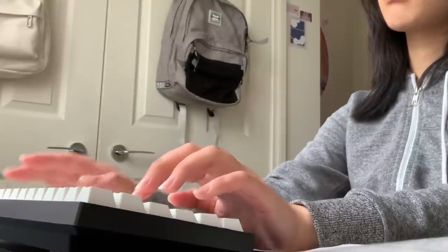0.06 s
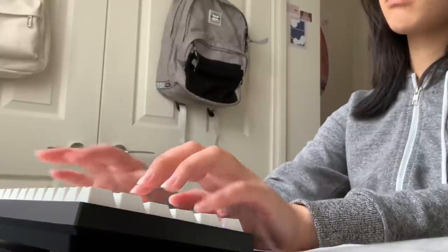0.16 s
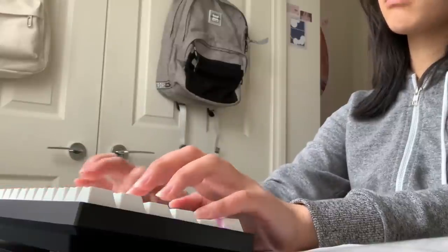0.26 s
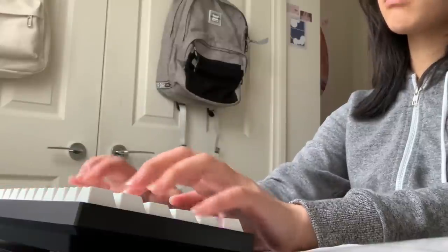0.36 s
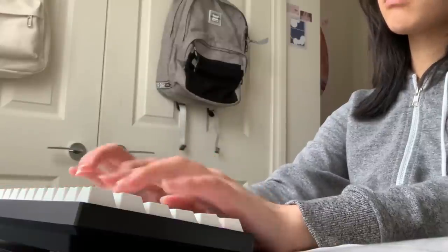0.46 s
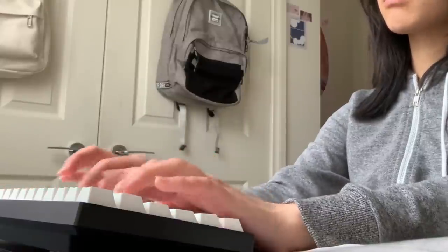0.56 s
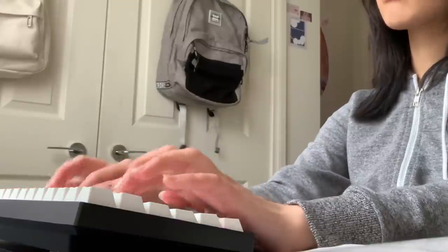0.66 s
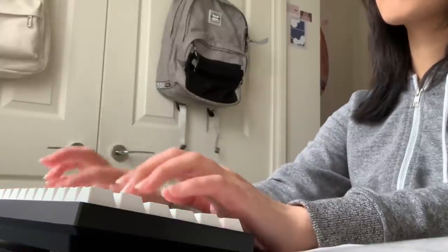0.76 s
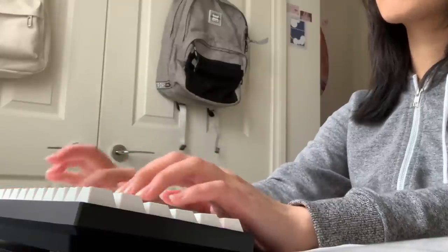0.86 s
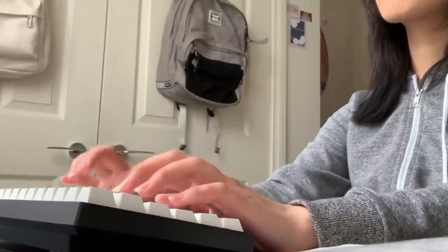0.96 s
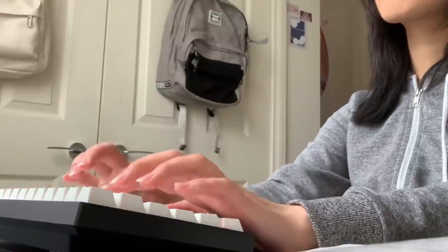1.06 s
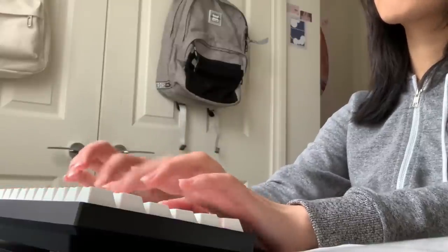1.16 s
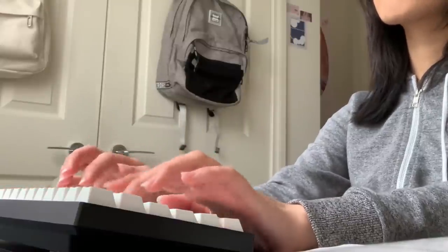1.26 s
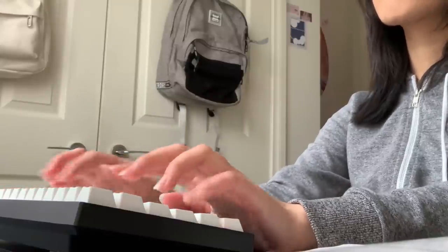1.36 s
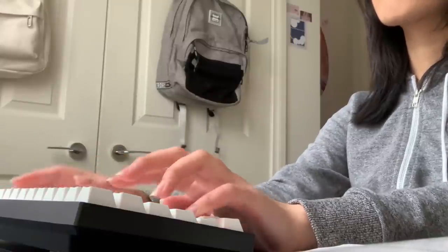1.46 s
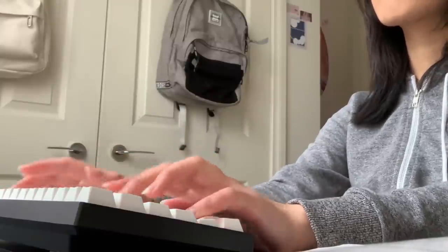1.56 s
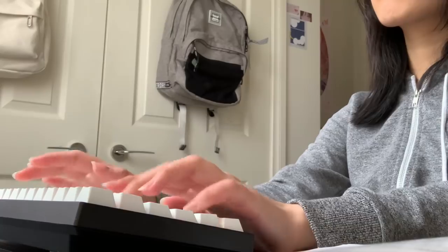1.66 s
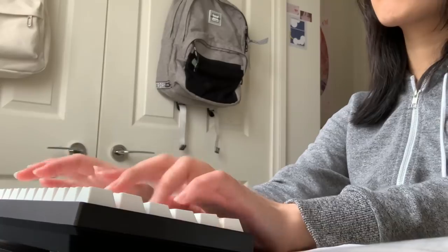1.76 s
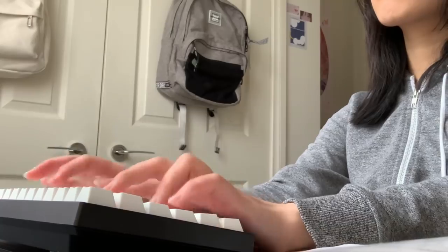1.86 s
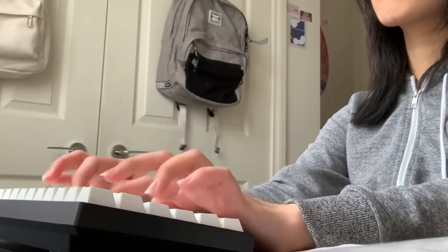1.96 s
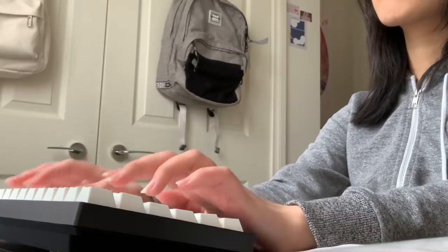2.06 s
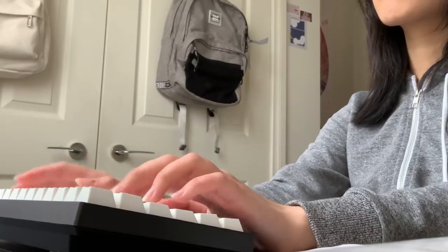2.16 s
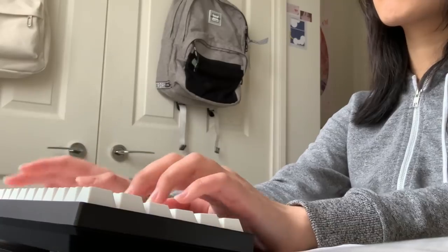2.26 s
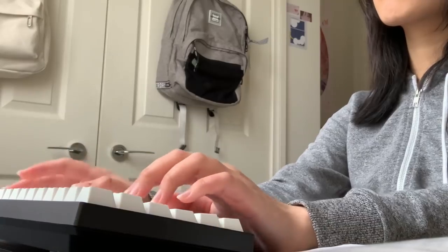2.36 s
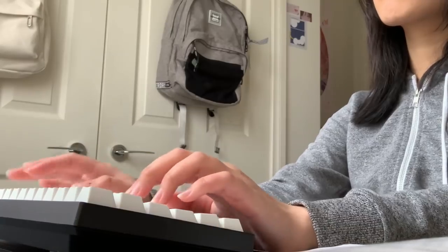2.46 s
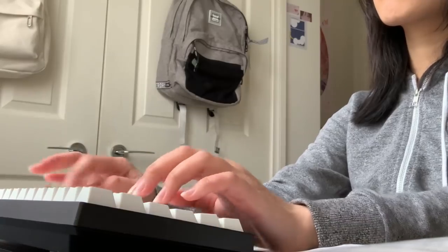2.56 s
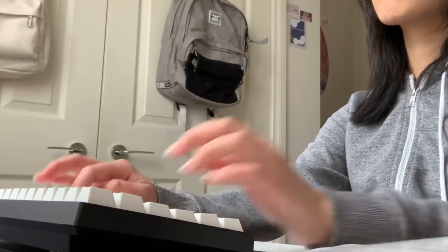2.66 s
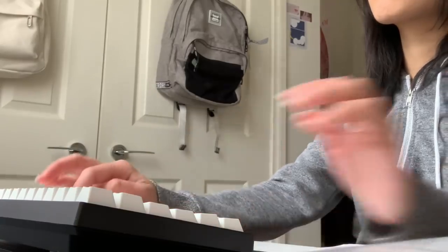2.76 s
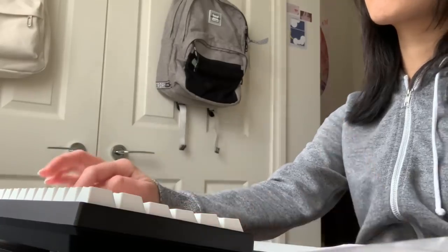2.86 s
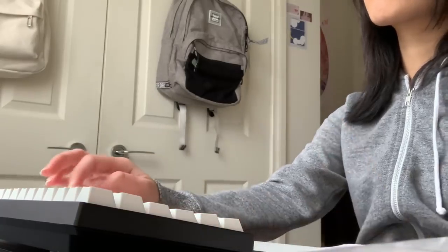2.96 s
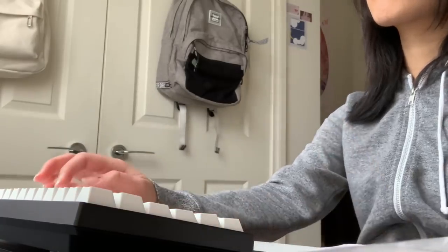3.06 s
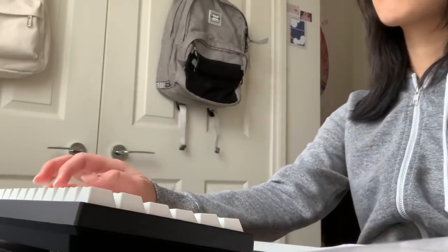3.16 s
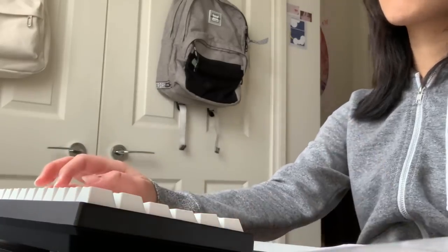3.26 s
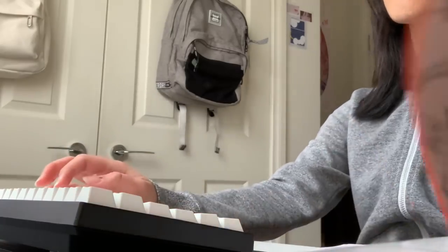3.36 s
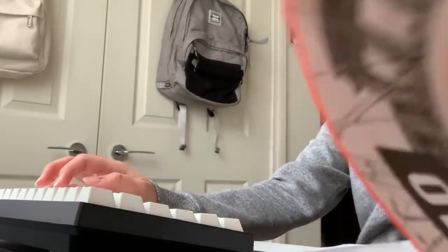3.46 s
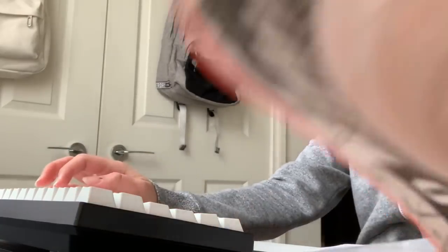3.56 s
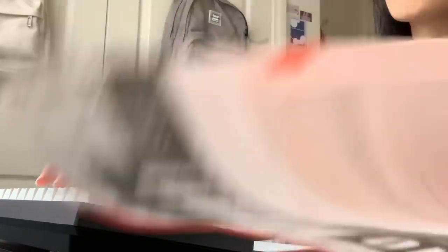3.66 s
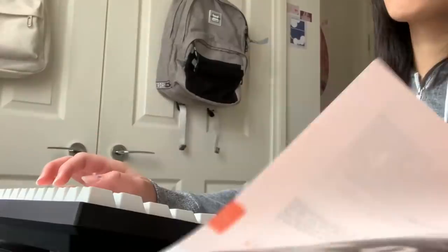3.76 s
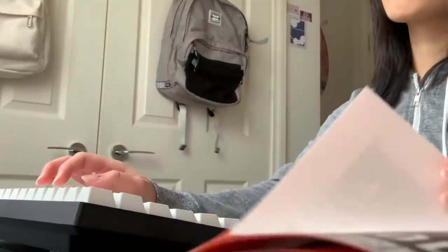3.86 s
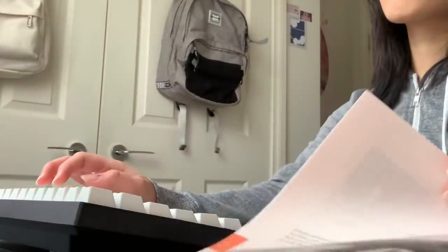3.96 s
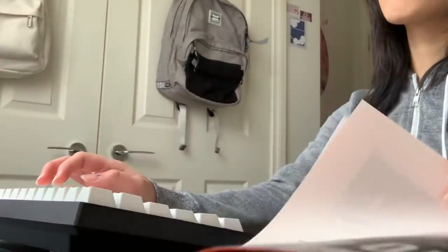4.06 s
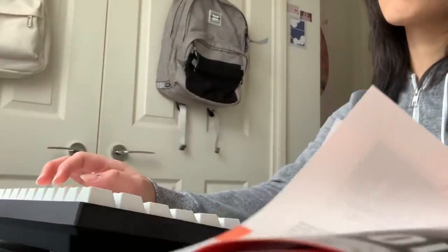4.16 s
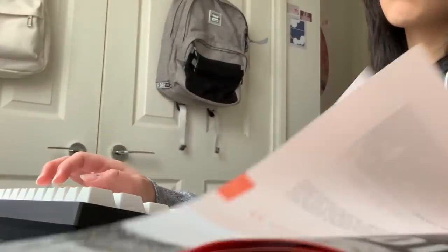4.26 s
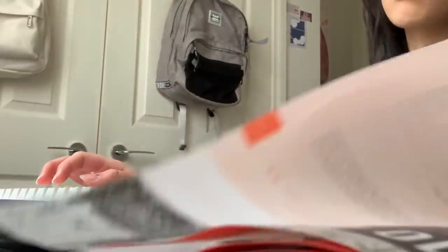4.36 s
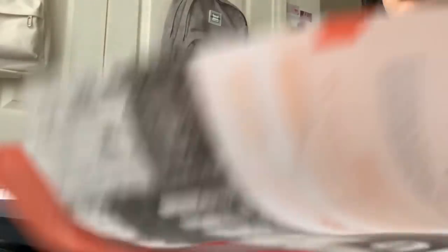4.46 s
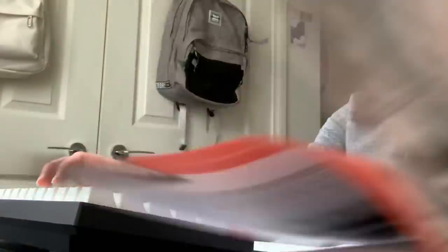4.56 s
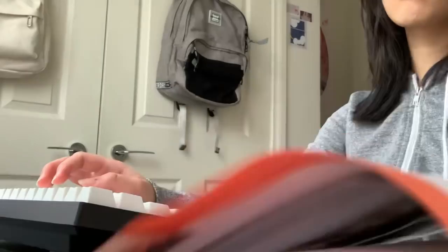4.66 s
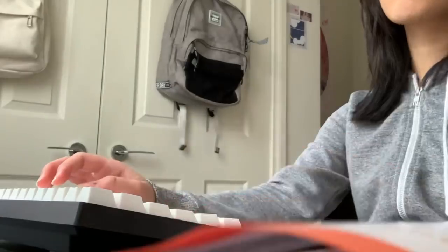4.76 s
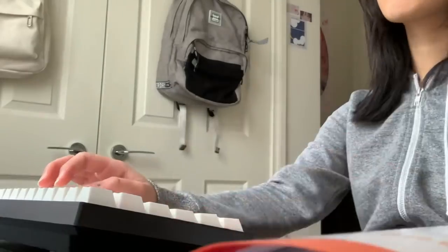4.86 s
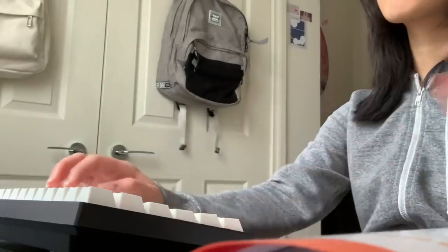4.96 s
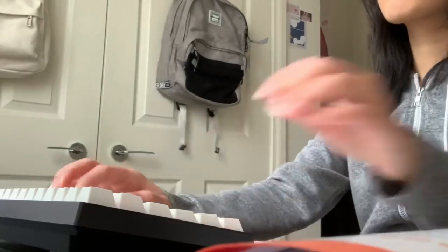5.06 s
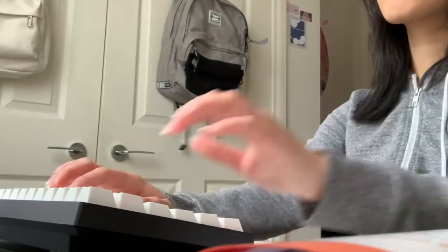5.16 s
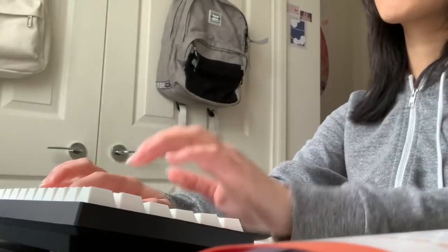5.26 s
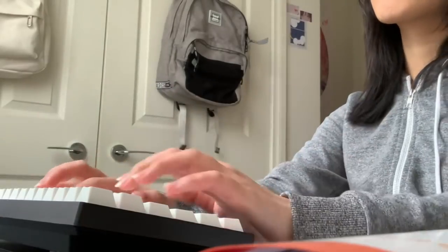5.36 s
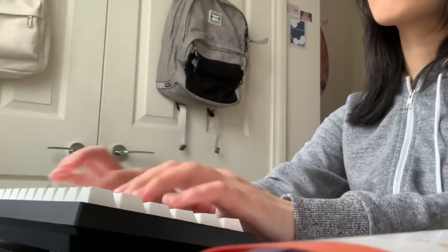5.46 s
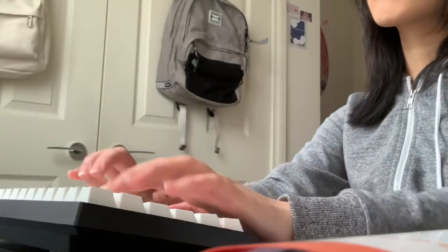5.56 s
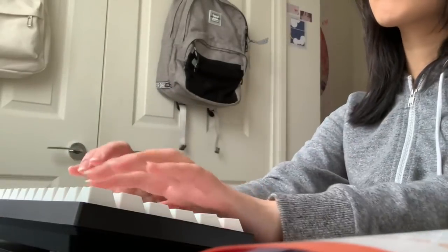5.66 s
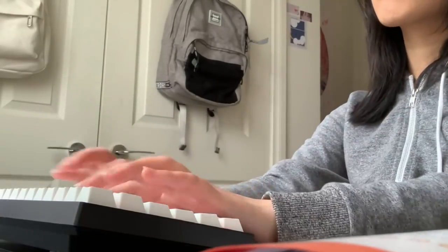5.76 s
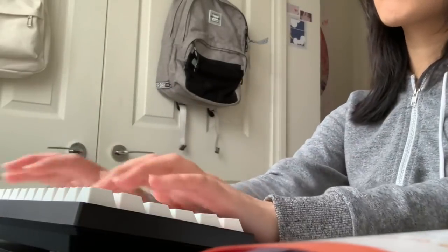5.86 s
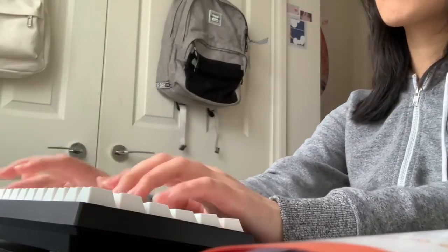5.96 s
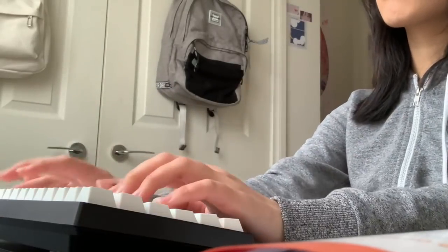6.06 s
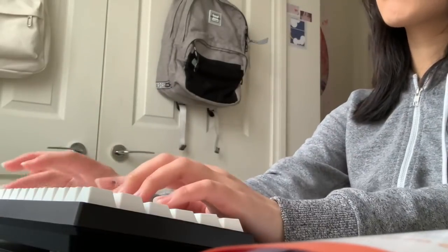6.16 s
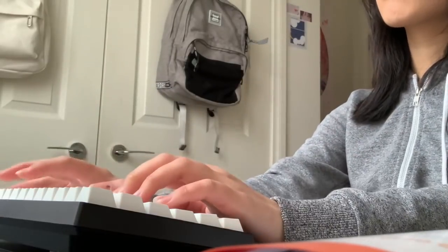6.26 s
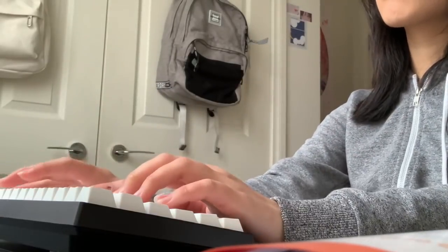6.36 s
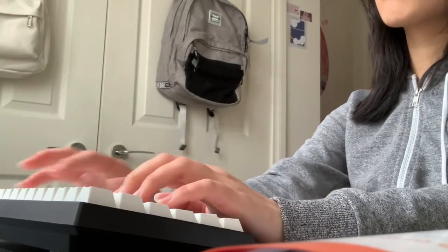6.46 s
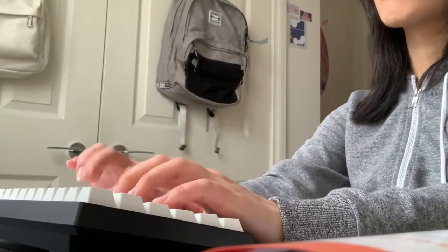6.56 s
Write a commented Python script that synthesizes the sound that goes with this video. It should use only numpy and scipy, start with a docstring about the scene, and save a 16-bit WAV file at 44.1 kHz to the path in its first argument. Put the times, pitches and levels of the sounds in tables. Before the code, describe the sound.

Rapid keyboard clacks with low desk thumps in a quiet bedroom, interrupted by a rustling page turn, followed by softer bursts of typing.

```python
"""Small bedroom: fast typing on a damped mechanical keyboard on a desk, heard close up.
Decaying modes and shaped noise make keycaps clack and bottoming keys ring the case and thump the desk.
In the pause one hand slides and turns a magazine page: speed-driven noise, creases and cracks.
Typing then resumes. A low rumble, faint hiss and mains hum run throughout; a short room tail follows."""
import sys
import numpy as np
from scipy import signal
from scipy.fft import rfft, irfft, next_fast_len
from scipy.io import wavfile
from scipy.ndimage import uniform_filter1d, map_coordinates

SR = 44100
rng = np.random.default_rng(int(sys.argv[2]) if len(sys.argv) > 2 else 0)


def to_wav(sig):
    """Store sig (one row per channel, or 1-D mono) as 16-bit WAV at the path in sys.argv[1].

    Samples outside -1..1 are clipped; the rate is SR.
    """
    pcm = np.clip(np.atleast_2d(sig), -1, 1) * 32767
    pcm = np.round(pcm).astype(np.int16)
    wavfile.write(sys.argv[1], SR, pcm.T)  # frames by channels


N = 291921

# background spectrum: (frequency [Hz], relative density [dB])
FLOOR_SPECTRUM = [(52, 3), (90, -2.5), (200, -15.5), (450, -17.5), (1100, -38.5), (2500, -55.5),
                  (16000, -62.5)]
# brushes, and a faint steady rustle under the later typing: (time [s], level [dB], t60 [s])
BRUSHES = [(0, -38.5, 0.037), (2.599, -51.5, 0.23), (5.481, -71.5, 7.3), (5.784, -39, 0.32),
           (6.31, -59, 0.15)]
# brush and rustle spectrum: (frequency [Hz], relative density [dB])
BRUSH_SPECTRUM = [(500, 7.0), (2200, -3.5), (6000, -8.0), (16000, -26.5)]
# keys bottom out, hands bump the desk:
# (time [s], case level [dB], desk level [dB], strongest case response [Hz]); levels relative
THOCKS = [(0.002, -36, -47.5, 258), (0.193, -29, -45, 246), (0.32, -44, -34.5, 272),
          (0.372, -26, -43.5, 349), (0.491, -26.5, -44.5, 326), (0.595, -30.5, -41.5, 384),
          (0.791, -39, -35.5, 240), (0.961, -35, -34, 362), (1.04, -32.5, -27.5, 274),
          (1.133, -27.5, -38, 318), (1.169, -28.5, -39, 260), (1.461, -20, -38, 273),
          (1.656, -27.5, -62, 348), (2.099, -25, -36.5, 280), (2.174, -32.5, -55, 406),
          (2.58, -34, -46, 238), (2.759, -41, -38, 365), (3.706, -48.5, -39.5, 270), (5.212, -36, -54, 306),
          (5.318, -17.5, -25.5, 315), (5.558, -33, -29.5, 213), (5.674, -29.5, -47, 358),
          (5.725, -37.5, -38, 372), (5.907, -27.5, -33.5, 265), (5.976, -29.5, -66, 315),
          (6.06, -27.5, -45, 289), (6.134, -33, -60, 280), (6.345, -36, -42.5, 285),
          (6.43, -35.5, -49, 410), (6.563, -35.5, -40.5, 282)]
# case modes: (frequency [Hz], relative level [dB], t60 [s])
CASE_MODES = [(165, -5.5, 0.3), (260.8, -3.5, 0.22), (299.6, 5, 0.12), (334.6, -3.5, 0.22),
              (398.6, -3, 0.2), (520, -10, 0.1)]
# desk modes: (frequency [Hz], relative level [dB], t60 [s])
DESK_MODES = [(63.3, -2, 0.4), (132.7, 26, 0.077)]
# keycaps strike their stops:
# (time [s], reference level [dB], hardness [0 cushioned - 1 bare plastic], cap pitch [Hz])
CLACKS = [(0.204, -40.5, 0.72, 1280), (0.315, -34.5, 0.5, 1250), (.371, -32.5, 0.27, 1080),
          (.488, -29.5, 0.58, 1240), (.53, -36, 0, 1240), (.585, -39, 0.54, 1420), (0.597, -38, 0.65, 3080),
          (0.634, -32.5, 0.5, 1245), (.683, -34, 0.71, 1114), (0.683, -44, 0.18, 3310),
          (0.858, -35, 0.35, 1205), (0.962, -35.5, 0.65, 1140), (1.036, -41, 0.79, 1230),
          (1.18, -27, 0.68, 993), (1.271, -28.5, 0.54, 1190), (1.583, -29, 0.23, 914),
          (1.656, -37.5, 0.44, 900), (1.668, -28.5, 0.35, 1200), (1.739, -37, 0.67, 1420),
          (1.772, -28.5, 0.57, 1236), (1.87, -26, 0.3, 1260), (1.961, -30.5, 0.52, 1250),
          (2.173, -28.5, 0.87, 613), (2.681, -34.5, 0.41, 1204), (2.731, -36.5, 0.57, 1070),
          (2.758, -42, 0.73, 3070), (2.875, -40, 0, 1130), (5.158, -52.5, 0.83, 2700),
          (5.313, -25.5, 0.85, 1290), (5.3136, -27, 0.33, 2930), (5.44, -34.5, 0.45, 1160),
          (5.538, -31, 0, 1210), (5.726, -36.5, 0.71, 1190), (5.977, -41.5, 0.97, 986)]
# a fingernail touches a cap: (time [s], reference level [dB])
TAPS = [(0.165, -52.5), (1.452, -48), (1.548, -37.5), (2.086, -51.5), (2.582, -39.5), (3.022, -58),
        (5.302, -46.5), (5.35, -42), (5.613, -53.5), (5.948, -41), (6.038, -40), (6.105, -46.5),
        (6.135, -38.5), (6.425, -43.5), (6.562, -41.5)]
# keycap modes at CAP_HZ: (frequency [Hz], relative level [dB], t60 [s])
KEYCAP_MODES = [(634, 4.5, 0.013), (891, -4.5, 0.03), (1237, 6.5, 0.016), (1623, -5, 0.014)]
# switch modes: (frequency [Hz], relative level [dB], t60 [s])
SWITCH_MODES = [(2562, 2.5, 0.019), (3096, -3.4, 0.0093)]
# snap of switch, also crease and thin scrape: (frequency [Hz], relative density [dB])
SNAP_SPECTRUM = [(1700, -4.5), (2250, -1), (2800, 9), (3300, -1), (4400, -0.5), (5800, -32)]
# hard contact, also crisp top of a crease: (frequency [Hz], relative density [dB])
TICK_SPECTRUM = [(3500, 1), (7300, -4.5), (9500, -5.5), (16000, -14.5)]
# page slides over its neighbour:
# (peak-speed time [s], speeding up [s], slowing down [s], rub level [dB], hiss over rub [dB])
SLIDES = [(3.16, 0.063, 0.12, -62, -3), (3.428, 0.19, 0.053, -51, 2), (3.608, 0.05, 0.049, -49.5, -5),
          (3.729, 0.05, 0.12, -60.5, -5), (4.031, 0.06, 0.29, -56.5, 3), (4.34, 0.05, 0.016, -51.5, 1.5),
          (4.452, 0.086, 0.031, -48.5, -5)]
# span of the page creases: (start [s], end [s])
HANDLING = (3.07, 4.84)
# sheet flutter, also dull key rattle: (frequency [Hz], relative density [dB])
FLAP_SPECTRUM = [(400, 9.5), (1450, 5.5), (3000, -33)]
# paper rub: (frequency [Hz], relative density [dB])
RUB_SPECTRUM = [(2000, -7.5), (2900, -4.5), (4600, -9), (8000, -17)]
# paper hiss: (frequency [Hz], relative density [dB])
HISS_SPECTRUM = [(4000, -9), (7000, -5), (12000, -6.5), (16000, -16.5)]
# page buckles and slaps: (time [s], body level [dB], crack level [dB], length [s])
FLICKS = [(3.172, -56, -76.5, 0.018), (3.5, -33, -37.5, 0.0076), (3.539, -41.5, -58, 0.0042),
          (3.568, -41.5, -55.5, 0.0025), (3.603, -37, -42, .002), (3.705, -41, -42.5, 0.0013),
          (3.803, -36.5, -45, 0.00095), (4.327, -59, -42.5, 0.00064), (4.601, -44.5, -59, 0.0057),
          (4.622, -38, -58, 0.0058), (4.666, -48, -58, 0.004), (4.7, -51, -62, 0.0017)]
# buckling sheet: (frequency [Hz], relative density [dB])
FOLD_SPECTRUM = [(300, 6), (780, 9), (1100, 3), (1550, 8.5), (2400, -11.5), (4300, -20)]
# room decay: (frequency [Hz], t60 [s])
ROOM_T60 = [(100, 0.38), (1200, 0.15), (16000, 0.24)]

HUM_HZ = 120
CASE_DB, DESK_DB = -5.5, 0.5  # overall level of case ring and desk thump
SPOT_DB, SPOT_OCTAVES = 8.5, 0.11  # lift and reach of modes favoured by the struck spot
JOLT_CASE_DB, JOLT_DESK_DB, JOLT_DELAY_S = -9.5, -18, 0.0013  # cap contact shakes case and desk
CAP_HZ, NAIL_HARDNESS = 1220, 0.93
REFERENCE_DB = -35  # usual contact
# snap of a usual soft contact, growth in dB per dB of level, gain when hard
SNAP_DB, SNAP_DB_PER_DB, SNAP_HARD_DB = -61, 0.73, 10.5
SWITCH_DB = 2.5  # switch ring over snap noise
SWITCH_DETUNE_RATIO, SWITCH_SCATTER_DB = 0.041, 8.5  # spread of the switch ring between contacts
TICK_DB, CUSHION_DB = -0.5, 63  # hard tick over contact level; loss when fully cushioned
SEAT_S, SEAT_DB = 0.00303, -3.5  # tilted cap: mean delay and level of the second edge
SCRAPE_DB, APPROACH_S = -18, 0.057  # key travel: level under impact; time to grow 60 dB
FLAP_DB, FLAP_EXPONENT = -1, 0.44  # flutter over rub; depends less on speed
HISS_EXPONENT = 1.3  # hiss rises faster with speed than rub
CRINKLE_DB = -12  # creases under rub
CRISP_DB, FOLD_DELAY_S, FLICK_T60_S = -9, 0.0026, 0.024  # top treble over crack; body lag; decay
LANDING_S, LANDING_DB, LANDING_WIDTH_S = 4.643, -49, 0.1
SHARED_ABOVE_HZ, SHARED_LEAD_S = 6800, 1 / 3750  # treble shared by both channels; left lead
LOW_CUT_HZ, TOP_HZ = 49.5, 16200


def amp(db):
    """Decibels to gain."""
    return 10 ** (np.asarray(db) / 20)


def unit(x):
    """x at rms 1."""
    return x / np.sqrt(np.mean(x ** 2) + 1e-20)


def crest(x, size):
    """x with its loudest stretch of size samples at rms 1."""
    power = uniform_filter1d(x ** 2, size, mode="constant")
    return x / np.sqrt(np.max(power) + 1e-20)


def along(points, hz):
    """Interpolate (frequency [Hz], value) points on a log axis."""
    f, v = np.transpose(points)
    return np.interp(np.log(hz + 1), np.log(f + 1), v)


def wobble(rate_hz):
    """Smooth random curve, rate_hz knots a second."""
    knots = rng.standard_normal(int(N * rate_hz / SR) + 4)
    return map_coordinates(knots, [np.arange(N) * rate_hz / SR])


def filtered(x, response):
    """x times a response of frequency."""
    n = x.shape[-1]
    m = next_fast_len(n + 4096)
    return irfft(rfft(x, m) * response(np.fft.rfftfreq(m, 1 / SR)), m)[..., :n]


def noise(spectrum, side_db, size):
    """Coloured stereo noise with a middle of rms 1; side_db sets its width."""
    white = rng.standard_normal((2, size))
    mid, side = unit(filtered(white, lambda hz: amp(along(spectrum, hz))))
    return mid + amp(side_db) * np.array([side, -side])


def ring(modes, t, detune, scatter_db):
    """Damped sine modes; each call shifts their pitch and strength at random."""
    hz, db, t60 = np.transpose(modes)[:, :, None]
    shift, strength = rng.standard_normal((2, len(modes), 1))
    decay = amp(db + scatter_db * strength - 60 * t / t60)
    return np.sum(decay * np.sin(2 * np.pi * hz * (1 + detune * shift) * t), axis=0)


def swell(t, rise_s):
    """A contact builds up over rise_s."""
    return 1 - np.exp(-(t / rise_s) ** 2)


def placed(x, left_db, lead_s):
    """Sound at two microphones: louder on the left by left_db, earlier there by lead_s."""
    sides = np.array([[.5], [-.5]])
    return filtered(x, lambda hz: amp(left_db * sides) * np.exp(2j * np.pi * hz * lead_s * sides))


def add(track, s, sound):
    """Mix a stereo sound into the track at s seconds."""
    part = track[:, max(round(s * SR), 0):][:, :sound.shape[1]]
    part += sound[:, :part.shape[1]]


def background():
    """Low building rumble and faint hiss as coloured noise; mains hum as a steady sine."""
    air = amp(-48.5) * noise(FLOOR_SPECTRUM, side_db=-6.5, size=N)
    hum = amp(-56.5) * np.sin(2 * np.pi * HUM_HZ * np.arange(N) / SR)
    return placed(air + hum, left_db=3.0, lead_s=0)


def brushes(rise_s):
    """Brushes as fading noise strokes, and a faint steady rustle under the later typing."""
    gain = 0
    for s, db, t60 in BRUSHES:
        age = np.maximum(np.arange(N) / SR - s, 0)
        gain = gain + amp(db - 60 * age / t60) * swell(age, rise_s)
    return gain * noise(BRUSH_SPECTRUM, side_db=-3.0, size=N)


def thud(case_modes, case_db, desk_db):
    """One blow through the board: the case rings and the desk gives under it."""
    t = np.arange(SR // 3) / SR
    punch = 1 + amp(-60 * t / 0.025)  # first swings are widest, then the finger damps them
    case = ring(case_modes, t, detune=0.034, scatter_db=2.5) * swell(t, rise_s=0.0042) * punch
    desk = ring(DESK_MODES, t, detune=0.089, scatter_db=7.5) * swell(t, rise_s=0.008) * punch
    case = placed(amp(case_db) * crest(case, size=256), left_db=2.0, lead_s=.00006)
    desk = placed(amp(desk_db) * crest(desk, size=384), left_db=6.0, lead_s=0)
    return case + desk


def bottoming():
    """Keys driven home thud, favouring case modes of their spot; cap contacts jolt the board lightly."""
    out = np.zeros((2, N))
    for s, case_db, desk_db, spot_hz in THOCKS:
        modes = []
        for hz, db, t60 in CASE_MODES:
            lift_db = SPOT_DB * np.exp(-(np.log2(hz / spot_hz) / SPOT_OCTAVES) ** 2)
            modes.append((hz, db + lift_db, t60))
        add(out, s, thud(modes, case_db + CASE_DB, desk_db + DESK_DB))
    for s, db, *_ in CLACKS:
        add(out, s + JOLT_DELAY_S, thud(CASE_MODES, db + JOLT_CASE_DB, db + JOLT_DESK_DB))
    return out


def rattle(db, scrape_db, linger_s):
    """Fingers shift on loose caps around each stroke, mostly after: uneven dull rattle and thin scrape."""
    strokes = np.zeros(N)
    for s, *_ in THOCKS + CLACKS:
        strokes[int(s * SR)] = 1
    age = np.arange(-SR // 10, SR // 5) / SR
    shape = np.exp(-np.abs(age) / np.where(age < 0, linger_s / 10, linger_s))
    busy = np.sqrt(np.abs(signal.fftconvolve(strokes, shape ** 2)[SR // 10:][:N]))
    dull = amp(db) * unit(amp(5 * wobble(130))) * noise(FLAP_SPECTRUM, side_db=0, size=N)
    thin = amp(scrape_db) * unit(amp(6 * wobble(170))) * noise(SNAP_SPECTRUM, side_db=0, size=N)
    return busy * (dull + thin)


def contact(t, t60_s):
    """A faint scrape grows as the key travels; the impact at t = 0 then dies away."""
    return np.where(t < 0, amp(SCRAPE_DB + 60 * t / APPROACH_S), amp(-60 * np.abs(t) / t60_s))


def clack(t, hz):
    """One edge of a keycap strikes the switch and rings briefly around hz."""
    modes = [(mode_hz * hz / CAP_HZ, db, t60) for mode_hz, db, t60 in KEYCAP_MODES]
    return ring(modes, t, detune=0.036, scatter_db=3.0) * swell(t, rise_s=0.00048)


def keycaps():
    """Plastic on plastic: the cap clacks; harder contact adds switch snap, ring and surface tick."""
    out = np.zeros((2, N))
    t = np.arange(-SR // 20, SR // 10) / SR
    after = np.maximum(t, 0)
    taps = [(s, db, NAIL_HARDNESS, CAP_HZ) for s, db in TAPS]
    for s, db, hardness, cap_hz in CLACKS + taps:
        snap_db = SNAP_DB + SNAP_DB_PER_DB * (db - REFERENCE_DB) + SNAP_HARD_DB * hardness
        tick_db = db + TICK_DB - CUSHION_DB * (1 - hardness)
        seated = np.maximum(t - SEAT_S * (.5 + rng.random()), 0)  # second edge lands
        cap = crest(clack(after, cap_hz) + amp(SEAT_DB) * clack(seated, cap_hz), size=128)
        snap = crest(noise(SNAP_SPECTRUM, side_db=-9, size=len(t)) * contact(t, t60_s=0.019), size=128)
        first = ring(SWITCH_MODES, after, SWITCH_DETUNE_RATIO, SWITCH_SCATTER_DB)
        second = ring(SWITCH_MODES, seated, SWITCH_DETUNE_RATIO, SWITCH_SCATTER_DB)
        switch = crest(first + amp(SEAT_DB) * second, size=128)
        tick = crest(noise(TICK_SPECTRUM, side_db=20.0, size=len(t)) * contact(t, t60_s=0.019), size=128)
        key = amp(db - 9.5) * cap
        key = key + amp(snap_db) * (snap + amp(SWITCH_DB) * switch) + amp(tick_db) * tick
        lead_s = rng.normal(.000055, .00002)  # keys sit at different places on the board
        add(out, s + t[0], placed(key, left_db=0.0, lead_s=lead_s))
    return out


def sliding():
    """Gains of flutter, rub and hiss: each follows the speed of the slides."""
    t = np.arange(N) / SR
    flap = rub = hiss = 0
    for s, rise, fall, db, hiss_db in SLIDES:
        speed = np.exp(-((t - s) / np.where(t < s, rise, fall)) ** 2)
        flap = np.hypot(flap, amp(db + FLAP_DB) * speed ** FLAP_EXPONENT)
        rub = np.hypot(rub, amp(db) * speed)
        hiss = np.hypot(hiss, amp(db + hiss_db) * speed ** HISS_EXPONENT)
    return flap, rub, hiss


def patchy(x, depth_db):
    """Colour drifts in patches of time and frequency as the sheet changes its curve."""
    z = signal.stft(x, nperseg=512)[2]
    field = uniform_filter1d(rng.standard_normal(z.shape[1:]), size=9, axis=0)
    field = uniform_filter1d(field, size=14, axis=1)
    return unit(signal.istft(z * amp(depth_db * unit(field)), nperseg=512)[1][:, :N])


def crinkles(rub, rate_hz, pitch_hz, spread_db):
    """Creases pop at random: a few cycles of their own pitch, scaled by how strongly the paper rubs."""
    out, t = np.zeros((2, N)), np.arange(SR // 50) / SR
    start, end = HANDLING
    for when, pitch, size, place in rng.random((round(rate_hz * (end - start)), 4)):
        s = start + when * (end - start)
        hz = pitch_hz * 2 ** (2 * pitch - 1)
        pop = np.sin(2 * np.pi * hz * t) * np.exp(-hz * t / 3)
        gain = rub[int(s * SR)] * amp(spread_db * size ** 2)
        add(out, s, placed(gain * pop, left_db=-8.0, lead_s=0.0017 * (place - .5)))
    return out


def page():
    """Paper slides on paper with a fine hiss; the bending sheet flutters and crinkles."""
    flap_gain, rub_gain, hiss_gain = sliding()
    catch = wobble(70)  # fibres catch and let go
    grain = amp(2.0 * wobble(970))
    flap = patchy(noise(FLAP_SPECTRUM, side_db=-1.5, size=N), depth_db=6)
    rub = patchy(noise(RUB_SPECTRUM, side_db=-0.5, size=N), depth_db=3.5)
    hiss = patchy(noise(HISS_SPECTRUM, side_db=-3.0, size=N), depth_db=3)
    flap = flap_gain * unit(amp(6.1 * catch)) * flap
    rub = rub_gain * unit(grain * amp(2 * catch)) * rub
    hiss = hiss_gain * unit(grain) * hiss
    creases = crinkles(amp(CRINKLE_DB) * rub_gain, rate_hz=170, pitch_hz=3400, spread_db=27)
    return flap + rub + hiss + creases


def flicks():
    """A crease runs through the sheet with a bright crack; the body of the sheet answers just after."""
    out, t = np.zeros((2, N)), np.arange(SR // 10) / SR
    for s, body_db, crack_db, length_s in FLICKS:
        run = swell(t, rise_s=0.002) * amp(-60 * np.maximum(t - length_s, 0) / FLICK_T60_S)
        crack = noise(SNAP_SPECTRUM, side_db=-3.0, size=len(t))
        crisp = amp(CRISP_DB) * noise(TICK_SPECTRUM, side_db=9, size=len(t))
        body = noise(FOLD_SPECTRUM, side_db=-5.0, size=len(t))
        add(out, s, amp(crack_db) * (crack + crisp) * run)
        add(out, s + FOLD_DELAY_S, amp(body_db) * body * run)
    return out


def landing():
    """The turned page scrapes down onto the pile in rough bursts."""
    speed = np.exp(-((np.arange(N) / SR - LANDING_S) / LANDING_WIDTH_S) ** 2)
    bursts = unit(amp(4.1 * wobble(120)))
    return amp(LANDING_DB) * speed * bursts * noise(FOLD_SPECTRUM, side_db=-3, size=N)


def room(x, side_db):
    """Short bedroom tail of decaying noise, crossfaded to a fresh one every quarter second."""
    wet, hop, t = np.zeros((2, N)), SR // 4, np.arange(SR // 3) / SR
    for start in range(0, N, hop):
        hz, age, z = signal.stft(rng.standard_normal((2, len(t))), SR)
        decay = amp(-60 * age / along(ROOM_T60, hz)[:, None])
        mid, side = signal.istft(z * decay)[1][:, :len(t)] * swell(t, rise_s=0.0012)
        tail = (mid + amp(side_db) * np.array([side, -side])) / np.linalg.norm(mid)
        share = np.maximum(1 - np.abs(np.arange(N) - start) / hop, 0)
        first = max(start - hop, 0)
        source = (x.mean(axis=0) * share)[None, first:start + hop]
        add(wet, first / SR, signal.fftconvolve(source, tail))
    return wet


def scene():
    """Keyboard and paper with their room, over the background."""
    caps = keycaps() + rattle(db=-58, scrape_db=-70.5, linger_s=0.047)
    body = bottoming()
    paper = page() + landing() + flicks() + brushes(rise_s=0.0082)
    tails = room(amp(-4.5) * caps + amp(-11.5) * body + amp(-6.5) * paper, side_db=-2.0)
    return caps + body + paper + tails + background()


def record(dry):
    """Top treble is one signal, reaching the left first; deepest bass and all above TOP_HZ are cut."""
    low = filtered(dry, lambda hz: 1 / (1 + (hz / SHARED_ABOVE_HZ) ** 20))
    treble = placed((dry - low)[0], left_db=0, lead_s=SHARED_LEAD_S)
    return filtered(low + treble,
                    lambda hz: (hz < TOP_HZ) / np.sqrt(1 + (LOW_CUT_HZ / (hz + 1)) ** 20))


dry = scene()
out = record(dry)
to_wav(out)
```